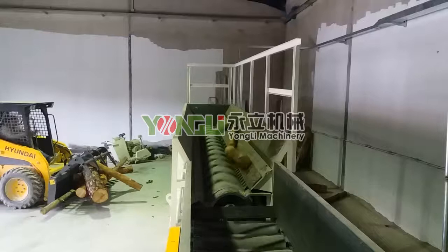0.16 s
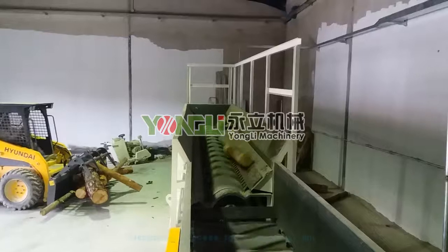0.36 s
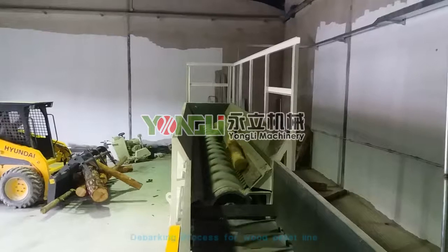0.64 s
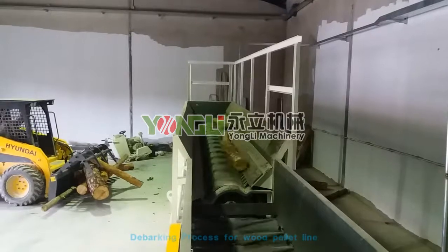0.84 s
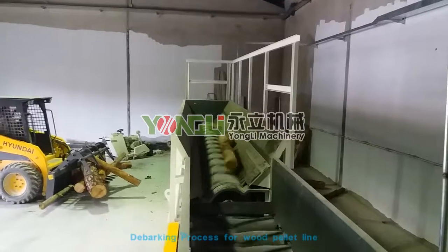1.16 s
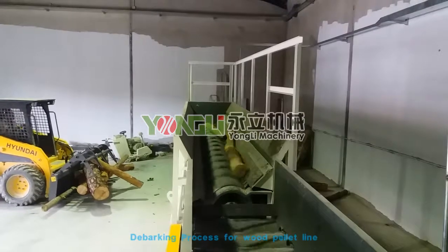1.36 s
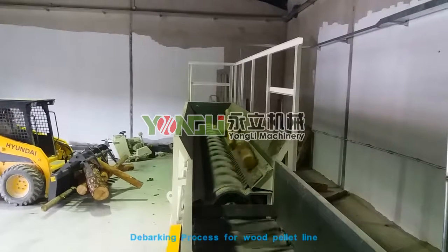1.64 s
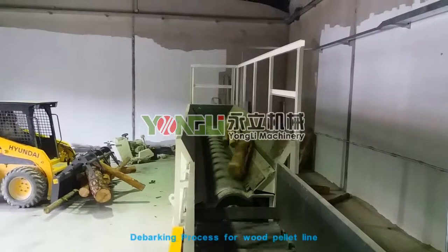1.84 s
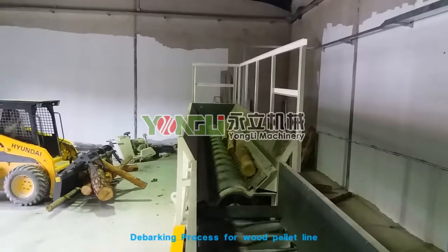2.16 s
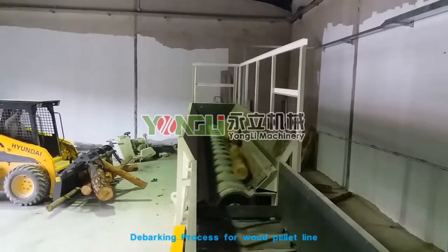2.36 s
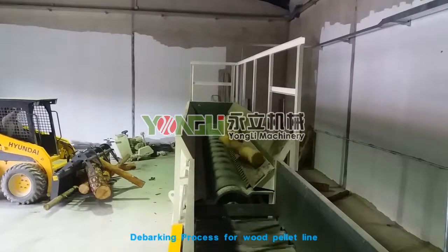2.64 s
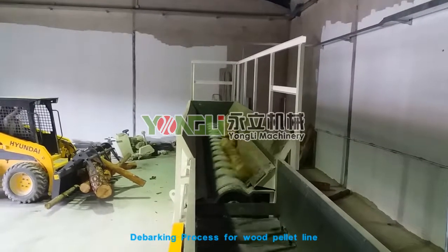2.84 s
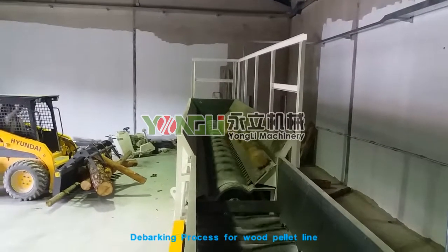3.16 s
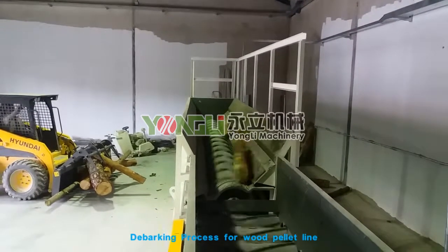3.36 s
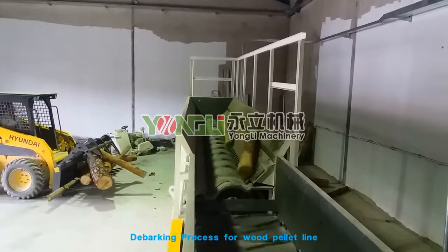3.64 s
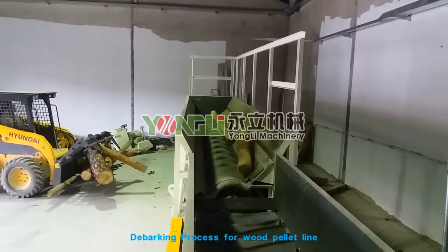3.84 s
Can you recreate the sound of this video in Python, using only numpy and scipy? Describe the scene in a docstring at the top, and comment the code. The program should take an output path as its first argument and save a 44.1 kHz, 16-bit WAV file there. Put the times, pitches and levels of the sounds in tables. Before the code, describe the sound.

After almost half a second of silence, a debarker's loud rumble swells up and holds, with irregular wooden thuds, ringing steel trough and rough bark clatter, reverberant indoors; short metal squeaks join from the middle onward.

```python
"""Near silence, then within a third of a second the roar of a log debarker in a large, bare hall fades in.
Random contacts, smeared by a diffuse noise tail, give the rumble of rolling logs and the clatter of torn bark.
Resonators give the ringing steel trough, its modes swelling and fading.
Decaying noise bursts give thuds and knocks throughout, and brief metallic squeaks from the middle on."""
import sys
import numpy as np
from scipy import signal
from scipy.fft import rfft, irfft
from scipy.io import wavfile

SR = 44100
rng = np.random.default_rng(int(sys.argv[2]) if len(sys.argv) > 2 else 0)


def output_pcm(signal):
    """Save a mono or channel-first signal as 16-bit PCM at the path in sys.argv[1].

    Samples are clipped to [-1, 1] before scaling.
    """
    pcm = np.clip(np.atleast_2d(signal).T, -1, 1) * 32767
    wavfile.write(sys.argv[1], SR, np.round(pcm).astype(np.int16))


N = 176400
T = np.arange(N) / SR  # s

# Level rows are joined by straight lines in dB; source levels are relative, ahead of gains and fade.
# Steel trough modes: mode_hz, level_db, t60_s
TROUGH_MODES = [(82.85, -23, 0.92), (132.2, -24, 0.4), (170.3, -24, 1.8), (249, -25, 1.6),
                (311.6, -27.5, 1.3), (345.7, -26, 0.59), (384, -32.5, 2.0), (403, -25.5, 4),
                (417, -32.5, 3.7), (433.7, -36, 0.98), (459, -29, 0.76), (592, -38, 1.4), (872, -38.5, 1.6)]
# Load shifting along the trough favours or damps a mode: mode_hz, centre_s, half_width_s, gain_db
MODE_SWELLS = [(82, 1.4, 0.19, -12), (82, 2.4, 0.84, 1.5), (131, 4.9, .5, 1.5), (171, 1.9, .45, 0),
               (171, 3.6, 1, 5), (250, 1.63, 0.58, 7.5), (349, 1.38, 0.46, 7.5), (349, 2.3, 0.29, 6),
               (415, 2.5, .5, 5.5), (454, 2.5, 0.54, 6)]
# Boom of the trough: time_s, level_db
BOOM_LEVELS = [(.68, -24), (.76, -13), (.85, -21), (.89, -29), (1.1, -19), (1.3, -26), (1.55, -33),
               (1.72, -15.5), (1.95, -21), (2.11, -41), (2.2, -17), (2.62, -20), (2.84, -26), (2.97, -22),
               (3.2, -22), (3.55, -24), (3.74, -17.5), (4, -30)]
# Logs rolling against the wall: time_s, level_db
ROLL_LEVELS = [(.7, -17), (1.0, -18.5), (1.1, -14.5), (1.25, -16.5), (1.42, -14.5), (1.71, -18.5),
               (1.78, -18), (1.87, -18.5), (2.02, -18.5), (2.14, -14.5), (2.4, -17.5), (2.75, -17.5),
               (2.87, -15.5), (3.13, -17.5), (3.3, -16.5), (3.58, -18), (3.72, -16.5), (3.9, -19.5)]
# Logs dropping on the rotors: start_s, deep_thud_db, wooden_body_db
THUD_BLOWS = [(.745, -23, -19.5), (.908, -7.5, -10.5), (1.07, -18.5, -17.5), (1.35, -30.5, -18),
              (1.725, -19.5, -14), (2.28, -24.5, -17), (2.475, -21, -29), (2.615, -16, -19),
              (2.87, -24.5, -27), (2.94, -16, -24), (3.11, -19, -19), (3.33, -29.5, -20), (3.48, -15, -27),
              (3.665, -22, -12), (3.885, -17.5, -14)]
# Logs hitting the wall: start_s, wooden_knock_db, bark_crack_db
KNOCK_BLOWS = [(.913, -35.5, -36), (1.03, -21, -31), (1.398, -16, -21.5), (1.56, -18, -41),
               (2.124, -17.5, -41), (2.21, -27.5, -37.5), (2.328, -13.5, -25), (2.492, -17.5, -22.5),
               (2.54, -18.5, -37), (2.69, -24, -33.5), (2.85, -26, -29), (3.204, -23, -25.5),
               (3.285, -21.5, -33.5), (3.425, -28.5, -36), (3.635, -19, -28), (3.687, -24.5, -21),
               (3.76, -24.5, -39)]
# Brief metallic squeaks: start_s, level_db
SQUEAKS = [(2.345, -17.5), (3.24, -28), (3.29, -20.5), (3.385, -27), (3.525, -20.5), (3.675, -20),
           (3.838, -15.5)]
# Tearing bark: time_s, level_db
TEARING_LEVELS = [(.49, -23), (.6, -23.5), (.72, -21), (.86, -20.5), (1.0, -19), (1.15, -21.5), (1.33, -22),
                  (1.47, -20.5), (1.62, -23), (1.78, -22), (1.93, -21), (2.28, -22), (2.55, -21.5),
                  (2.72, -21), (2.95, -21), (3.08, -23), (3.23, -20.5), (3.44, -22), (3.64, -20),
                  (3.95, -20)]
# Treble of the bark: time_s, gain_db
TREBLE_GAINS = [(.5, 3), (.76, -0.5), (1.0, -1.5), (1.35, 0.5), (1.62, 0), (1.75, -3), (1.87, -2.5),
                (1.97, -0.5), (2.9, -0.5), (3.35, 0), (3.75, -2), (4, -1.5)]
# Fade-in: time_s, gain_db
FADE_GAINS = [(.426, -100), (.436, -25.5), (.48, -12.5), (.55, -3.5), (.63, -1), (.73, 1)]

# Spectra, before scaling to rms 1: frequency_hz, level_db
# Boom of the trough: frequency_hz, level_db
BOOM_SPECTRUM = [(35, -44), (60, -30), (72, -15), (81, 7), (92, -3.5), (108, -7.5), (200, -19.5),
                 (500, -68)]
# Rolling logs: frequency_hz, level_db
ROLL_SPECTRUM = [(30, -44.5), (41, -25.5), (52, -9), (66, -11), (80, -5), (108, -6.5), (135, -1),
                 (210, 0.5), (285, 1), (335, 0), (388, -4), (440, -3.5), (495, -5.5), (590, -1), (660, -9),
                 (900, -14), (1200, -19.5), (3000, -63.5)]
# Deep part of a thud: frequency_hz, level_db
THUD_SPECTRUM = [(40, -30), (65, -22.5), (86, 15), (105, -0.5), (135, -14), (400, -46)]
# Wooden body of a thud: frequency_hz, level_db
BODY_SPECTRUM = [(70, -24.5), (110, -6), (135, 11.5), (175, -6), (220, -10.5), (400, -20.5), (1500, -49)]
# Wooden knock: frequency_hz, level_db
KNOCK_SPECTRUM = [(100, -25), (300, -6.5), (600, 6), (1000, -0.5), (2200, -14), (4000, -22), (7000, -49)]
# Crack of bark: frequency_hz, level_db
CRACK_SPECTRUM = [(400, -11.5), (1000, 4), (2200, 0.5), (3000, -10.5), (4200, -2), (5600, -8.5),
                  (7000, -22.5), (8500, -39.5)]
# Metallic squeak: frequency_hz, level_db
SQUEAK_SPECTRUM = [(1700, -33), (2080, 0), (2230, 0), (2380, -10), (3000, -37)]
# Tearing bark: frequency_hz, level_db
BARK_SPECTRUM = [(400, -15), (800, 0), (1150, -1.5), (1800, -0.8), (2250, 0), (2850, -6), (3800, -7.5),
                 (5000, -14), (5900, -21), (6800, -36.5), (8000, -54.5)]

TROUGH_GAIN_DB, BOOM_GAIN_DB, ROLL_GAIN_DB, BARK_GAIN_DB = -2.5, -1.5, 0.5, 0.52
BITES_PER_S, BUMPS_PER_S = 700, 160  # mean rates
THUD_T60_S, KNOCK_T60_S, CRACK_T60_S, SQUEAK_T60_S = 0.36, 0.42, 0.34, 0.11
ATTACK_S = 0.004  # time constant
HALL_T60_S, DIRECT_DB = 1.03, -5.5  # direct sound relative to the tail
TREBLE_HZ, RUMBLE_CUT_HZ, TOP_CUT_HZ = 3000, 46, 6900
PEAK_LIMIT = 0.88


def from_db(db):
    """Amplitude factor of a level in dB."""
    return 10 ** (np.asarray(db) / 20)


def rms_one(x):
    """Scales to rms 1."""
    return x / np.sqrt(np.mean(x ** 2) + 1e-20)


def level(rows):
    """Amplitude gain over time from (time_s, db) rows."""
    return from_db(np.interp(T, *np.transpose(rows)))


def colour(x, spectrum):
    """Filters by (frequency_hz, level_db) points on a log frequency axis; rms 1."""
    point_hz, point_db = np.transpose(spectrum)
    bin_hz = np.maximum(np.fft.rfftfreq(N, 1 / SR), 1)
    bin_db = np.interp(np.log(bin_hz), np.log(point_hz), point_db)
    return rms_one(irfft(rfft(x) * from_db(bin_db), N))


def steadied(x, span_s):
    """Divides by the local rms to even out slow swings of level."""
    window = signal.windows.hann(int(span_s * SR))
    energy = signal.fftconvolve(x ** 2, window, "same")
    weight = signal.fftconvolve(np.ones(N), window, "same")
    return x / np.sqrt(np.abs(energy / weight) + 1e-12)


def contacts(per_s, spread_db):
    """Clicks at random moments, of random sign and uneven strength; rms 1."""
    strength_db = spread_db * np.minimum(rng.standard_normal(N), 2)
    clicks = from_db(strength_db) * rng.choice([-1, 1], N)
    return rms_one(clicks * (rng.random(N) < per_s / SR))


def hall(x):
    """Direct sound plus a diffuse tail of decaying noise, drawn anew for each place."""
    tail = rng.standard_normal(N) * from_db(-60 * T / HALL_T60_S)
    wet = irfft(rfft(x) * rfft(tail), N)  # circular: the hall is already full at the start
    return from_db(DIRECT_DB) * rms_one(x) + rms_one(wet)


def clatter(per_s, spread_db, places=6):
    """Contacts at several places along the rotors, each through its own hall tail."""
    return sum(hall(contacts(per_s / places, spread_db)) for _ in range(places))


def blows(starts_s, levels_db, spectrum, t60_s):
    """Coloured noise under envelopes that rise fast and decay exponentially."""
    envelope = 0
    for start_s, level_db in zip(starts_s, levels_db):
        age_s = np.maximum(T - start_s, 0)
        rise = 1 - np.exp(-age_s / ATTACK_S)
        decay = np.exp(-np.log(1000) * age_s / t60_s)
        envelope = envelope + from_db(level_db) * rise * decay
    noise = colour(rng.standard_normal(N), spectrum)
    return envelope * steadied(noise, span_s=0.045)


def trough():
    """Bumps ring two-pole steel modes, which swell or fade as the load shifts."""
    mode_hz = np.array(TROUGH_MODES)[:, 0]
    swells_db = np.zeros((len(TROUGH_MODES), N))
    for hz, centre_s, half_width_s, gain_db in MODE_SWELLS:
        nearest = np.argmin(np.abs(mode_hz - hz))
        swells_db[nearest] += gain_db * np.exp(-((T - centre_s) / half_width_s) ** 2)
    out = 0
    for (hz, level_db, t60_s), swell_db in zip(TROUGH_MODES, swells_db):
        radius = np.exp(-np.log(1000) / (t60_s * SR))
        angle = 2 * np.pi * hz / SR
        poles = [1, -2 * radius * np.cos(angle), radius * radius]
        bumps = contacts(BUMPS_PER_S, spread_db=3.5) + 1e-18
        ring = steadied(signal.lfilter([1, 0, -1], poles, bumps), span_s=0.32)
        out = out + from_db(TROUGH_GAIN_DB + level_db + swell_db) * ring
    return out


def trough_boom():
    """The whole trough booms under the bumping logs: contacts in a low, narrow band."""
    boom = colour(clatter(BUMPS_PER_S, spread_db=4.5), BOOM_SPECTRUM)
    return from_db(BOOM_GAIN_DB) * level(BOOM_LEVELS) * steadied(boom, span_s=0.099)


def rolling_logs():
    """Logs bump along the rotors: sparse contacts with a dull colour."""
    roll = colour(clatter(BUMPS_PER_S, spread_db=3.5), ROLL_SPECTRUM)
    return from_db(ROLL_GAIN_DB) * level(ROLL_LEVELS) * steadied(roll, span_s=0.12)


def squeaks():
    """Brief squeaks of steel: short bursts of narrow-band noise."""
    return blows(*np.transpose(SQUEAKS), SQUEAK_SPECTRUM, SQUEAK_T60_S)


def wall_knocks():
    """Logs hit the wall: a wooden knock with a crack of bark."""
    starts_s, knock_db, crack_db = np.transpose(KNOCK_BLOWS)
    knocks = blows(starts_s, knock_db, KNOCK_SPECTRUM, KNOCK_T60_S)
    return knocks + blows(starts_s, crack_db, CRACK_SPECTRUM, CRACK_T60_S)


def rotor_thuds():
    """Logs drop on the rotors: a deep thud with a wooden body."""
    starts_s, deep_db, body_db = np.transpose(THUD_BLOWS)
    deep = blows(starts_s, deep_db, THUD_SPECTRUM, THUD_T60_S)
    return deep + blows(starts_s, body_db, BODY_SPECTRUM, THUD_T60_S)


def bark():
    """Rotor teeth bite and tear off bark: dense contacts, now brighter, now duller."""
    bites = clatter(BITES_PER_S, spread_db=3.5, places=8)
    tearing = steadied(colour(bites, BARK_SPECTRUM), span_s=0.3)
    highpass = signal.butter(3, TREBLE_HZ, "high", fs=SR, output="sos")
    treble = signal.sosfiltfilt(highpass, tearing)
    tilted = tearing + (level(TREBLE_GAINS) - 1) * treble
    return from_db(BARK_GAIN_DB) * level(TEARING_LEVELS) * tilted


def scene():
    """The running debarker, one channel."""
    background = trough() + trough_boom() + rolling_logs()
    strikes = squeaks() + wall_knocks() + rotor_thuds()
    return (background + strikes + bark())[None]


def record(dry):
    """Fade-in, bass cut, rounded peaks, steep top cut."""
    faded = dry * level(FADE_GAINS)
    bass_cut = signal.butter(5, RUMBLE_CUT_HZ, "high", fs=SR, output="sos")
    trimmed = signal.sosfilt(bass_cut, faded)
    rounded = trimmed / (1 + (trimmed / PEAK_LIMIT) ** 8) ** (1 / 8)
    top_cut = signal.ellip(12, 0.1, 90, TOP_CUT_HZ, fs=SR, output="sos")  # ripple_db, stopband_db
    return signal.sosfilt(top_cut, rounded)


dry = scene()
out = record(dry)
output_pcm(out)
```